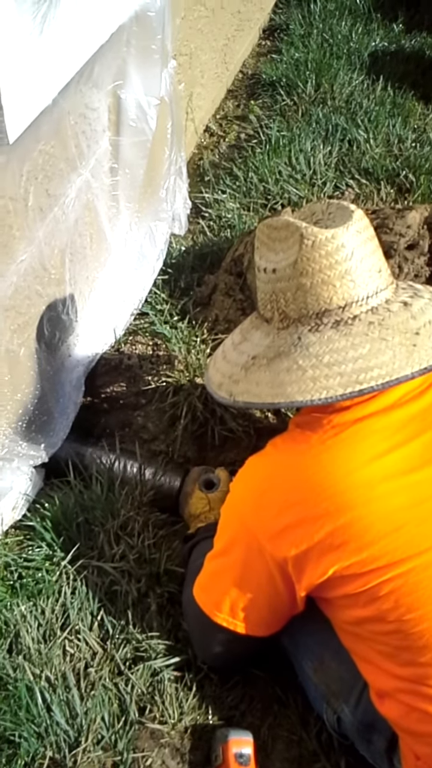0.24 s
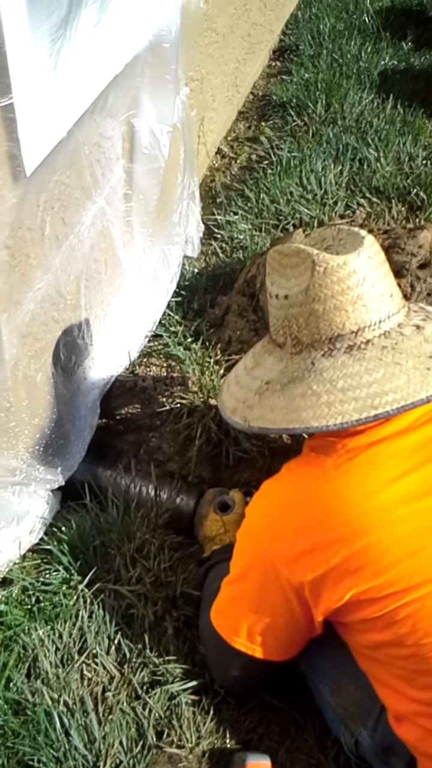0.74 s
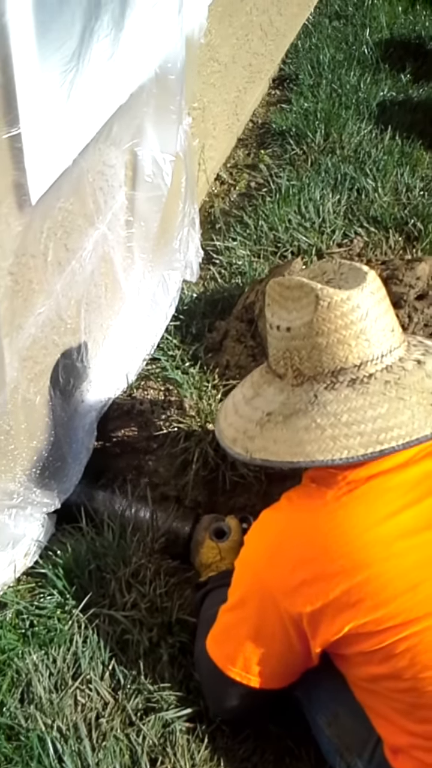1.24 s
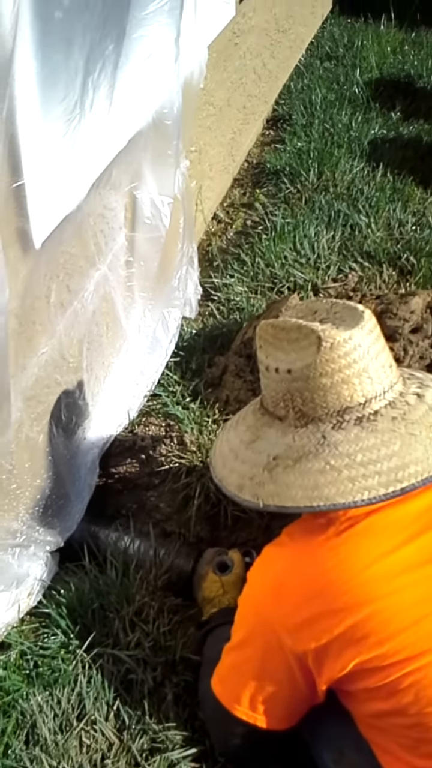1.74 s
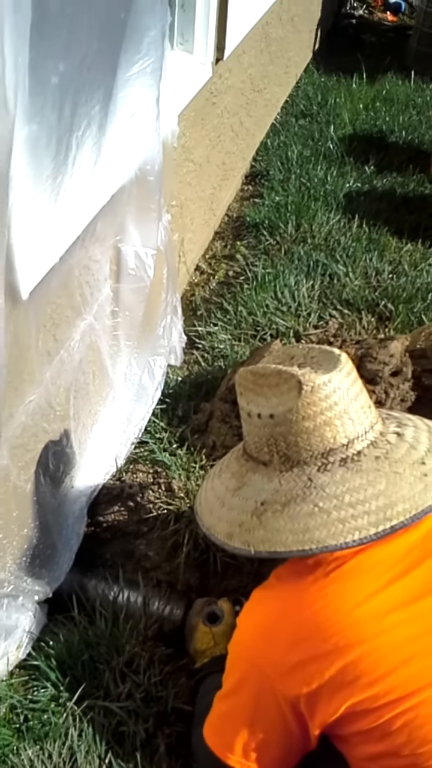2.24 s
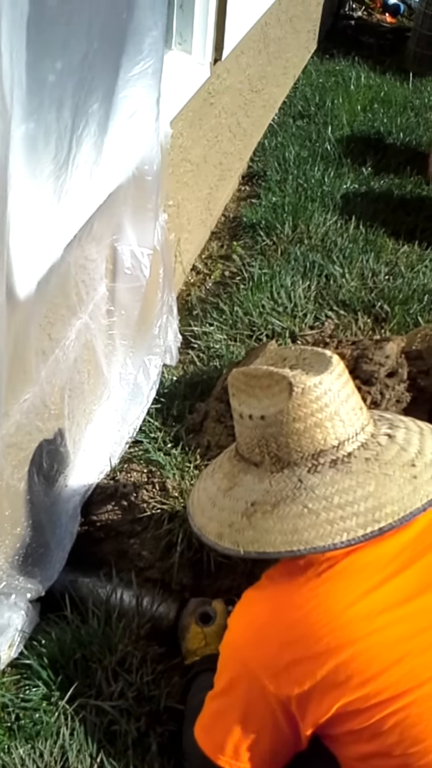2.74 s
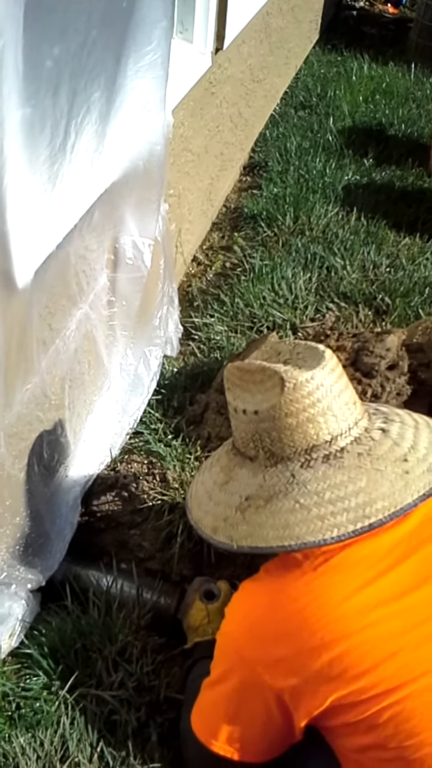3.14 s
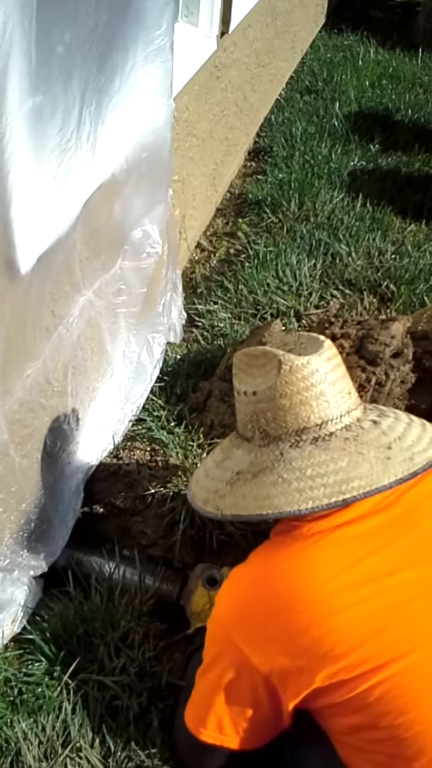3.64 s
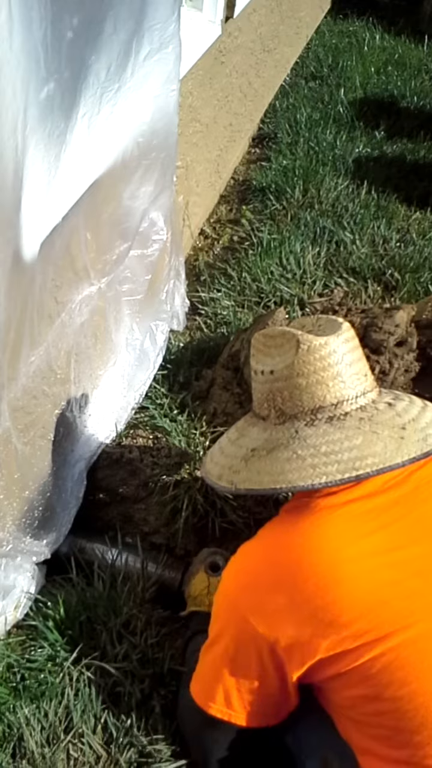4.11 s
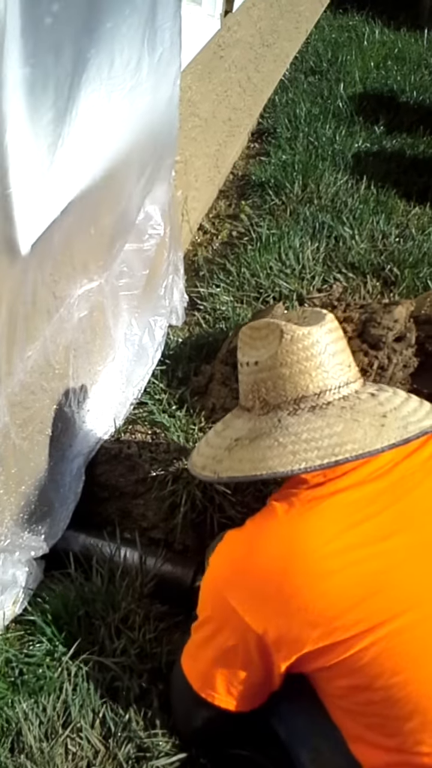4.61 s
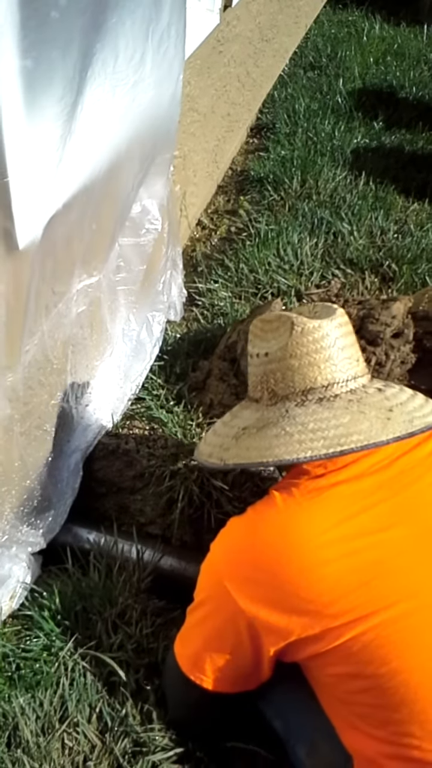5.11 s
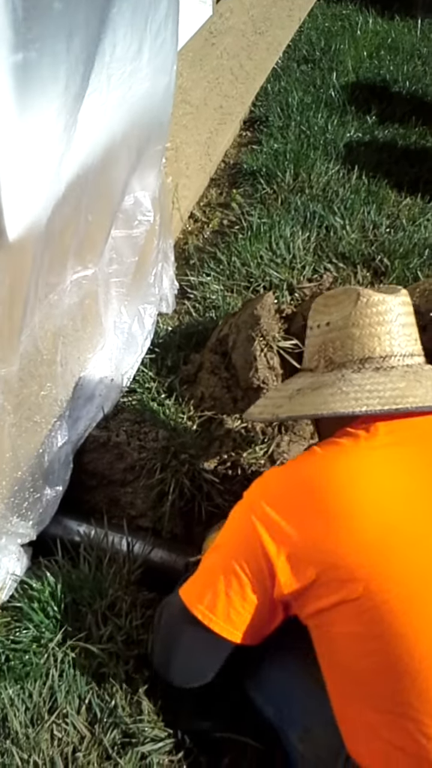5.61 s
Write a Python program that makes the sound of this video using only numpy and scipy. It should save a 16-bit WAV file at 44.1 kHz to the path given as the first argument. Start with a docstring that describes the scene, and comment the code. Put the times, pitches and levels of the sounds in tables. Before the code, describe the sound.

An electric core drill cuts into a concrete wall outdoors, a loud, harsh grinding under a high, wavering gear whine. About halfway through, the motor winds down and the steel barrel squeaks to a halt with a knock. A quiet, steady hiss and a faint distant machine hum remain. The drill is then shifted, with short scrapes, ringing metal knocks and a few light clicks.

```python
"""A harsh grinding under a wavering gear whine: an electric core drill cuts a concrete wall outdoors.
Fracturing grit excites the resonances of the steel barrel, and the gears sound multiples of the shaft rate.
The trigger is let go, the barrel drags and squeaks to a halt, and a steady hiss with a faint machine
hum remains. The drill is then shifted: it scrapes, the barrel knocks in its hole, and something clicks."""
import sys
import numpy as np
from scipy.fft import rfft, irfft, next_fast_len
from scipy.io import wavfile
from scipy.ndimage import uniform_filter1d, minimum_filter1d, map_coordinates

SR = 44100
rng = np.random.default_rng(int(sys.argv[2]) if len(sys.argv) > 2 else 0)


def unload_wav(signal):
    """Save mono or channel-first audio to the path in sys.argv[1] as 16-bit WAV at rate SR, clipped to [-1, 1]."""
    wavfile.write(
        sys.argv[1],
        SR,
        np.round(np.clip(np.atleast_2d(signal).T, -1, 1) * 32767).astype(np.int16),
    )


N = 258426
TIME = np.arange(N) / SR

# Gear, fan and commutator tones.
# Each row: multiple of the shaft rate, relative level in dB at a light bite, the same at a deep bite.
SHAFT_TONES = [(10, -23, -29), (11, -32, -28), (12, -30, -34), (16, -32, -31), (20, -33, -35),
               (21, -28, -24.5), (48, -29, -25.5)]

# Resonances. Each row: frequency in Hz, bandwidth in Hz, relative level in dB.
BARREL_MODES = [(2340, 40, -10), (2460, 140, -15.5), (2700, 110, -4), (3440, 110, -10.5), (3675, 45, -3),
                (4115, 41, -4.5), (4660, 95, 1.5), (4800, 126, -5), (5900, 370, -12.5), (7420, 260, -9)]  # the barrel, damped by the wall
BENDING_MODES = [(690, 71, -1.5), (1108, 80, 2), (1293, 100, -1), (1460, 58, -5), (1826, 78, 1.5),
                 (2155, 170, 5), (2840, 130, -3)]  # its slower bending
EDGE_MODES = [(4640, 550, 1), (5700, 200, -0.5), (6380, 320, 2.5)]
BODY_MODES = [(2450, 250, 2), (2930, 46, 1)]
HISS_PEAK = [(7210, 710, 0)]

# Noise spectra. Each row: frequency in Hz, relative spectral density in dB.
LIGHT_BITE_SPECTRUM = [(1500, -52), (2400, 3), (3200, -3), (4700, 4.5), (5500, -4), (7000, -5.5), (7950, 2),
                       (8800, -5.5), (9700, -12.5), (11000, -11), (15500, -12)]
DEEP_BITE_SPECTRUM = [(1500, -48), (2400, -2.5), (3200, -6), (4600, -1), (5300, -0.5), (5900, 2.5),
                      (7400, -3.5), (8600, -13), (10500, -6.5), (12500, -12), (15500, -17)]
WALL_SPECTRUM = [(50, -55), (90, -47), (150, -13), (240, -2.5), (600, -2), (850, -1.5), (1200, 0.5),
                 (2000, 2.5), (3500, -14)]
BUMP_SPECTRUM = [(40, -38), (100, -7), (150, -1), (280, 2), (600, -21)]
CRACK_SPECTRUM = [(60, -37), (150, -35), (400, -23), (650, -1.5), (950, -11), (1270, 5.5), (1600, -21),
                  (2300, 7.5), (3200, -5), (4600, -2.5), (6400, -3.5), (8500, -8), (15500, -22)]
THUD_SPECTRUM = [(30, 1), (70, -5), (250, 1), (900, -40)]
EDGE_SPECTRUM = [(2000, -21), (4500, 1), (6500, 3), (8000, 3), (10000, -16), (15500, -11)]
BODY_SPECTRUM = [(100, -39), (600, -4), (1800, -1.5), (2750, 6), (3400, -5), (5500, -17)]
YARD_SPECTRUM = [(30, -50), (80, -24), (170, -18.5), (240, -14), (300, -18), (480, -7), (1000, -8),
                 (1700, 1.5), (2500, 0), (3600, -7), (5500, -7.5), (7400, -9.5), (10000, -15), (15500, -16)]

# Successive slips of the halting barrel. Each row: frequency in Hz, level in dB.
SLIPS = [(2820, -15), (1480, -14), (2620, -13), (2750, -14), (5020, -11), (1110, -18)]
# Jolts of the drill body. Each entry: start in seconds.
BUMP_STARTS = [.079, .629, .832, 1.129, 1.419, 1.739, 1.926, 2.129, 2.249, 2.42]
# The loose barrel hits its hole. Each row: start in seconds, levels in dB of crack, ring and thud.
KNOCKS = [(2.932, -15, -34, -52), (4.704, -11, -20.5, -56), (4.713, -14, -22, -35), (4.751, -6.5, -15, -62)]
# Modes of the struck barrel. Each row: frequency in Hz, relative level in dB, 60 dB decay time in seconds.
STRUCK_MODES = [(672, -5.5, .24), (1276, -4.5, .34), (1812, -6, .3), (2186, -.5, .34), (2225, -3, .28),
                (2500, 1, .07), (2695, -5, .25), (3798, -5, .23), (4650, -2, .07), (5297, -7, .14),
                (7140, -13, .2)]
# The barrel slides in its hole.
# Each row: start, attack and length in seconds, scrape level in dB, squeal in dB relative to the scrape.
SLIDES = [(4.372, .0006, .036, -13.5, -5), (4.428, .001, .028, -21.5, -16), (4.677, .009, .054, -12, -16)]
# Clicks of the handled tool. Each row: start in seconds, relative levels in dB of edge and body.
CLICKS = [(3.239, -28, -25), (4.515, -22, -42), (5.024, -6.5, -15), (5.253, -32, -28), (5.430, -21, -40),
          (5.585, -23, -34)]
# Tones of a distant machine. Each row: frequency in Hz, level in dB.
HUM_TONES = [(80, -72), (168, -65), (356, -58), (560, -52), (587, -50.5), (1001, -49), (1297, -52),
             (1416, -52), (1766, -45), (2003, -47), (2589, -51), (2649, -51), (2945, -53)]

BITE_S, TRIGGER_OFF_S, JAM_S = 1.17, 2.51, 2.939  # the teeth sink in, the power stops, the barrel jams
SLIDE_T60, CLICK_T60 = 0.074, 0.088  # seconds to fall 60 dB


def drill():
    """Amplitude modulation: the barrel binds once a turn, which sways the force of the cut."""
    bite, speed_share, shaft_hz = motor()
    cut_db, drag_db = friction_levels(bite, speed_share)
    gear_ratio = 13.1
    barrel_angle = phase(shaft_hz / gear_ratio * (1 + .03 * wobble(8)))
    force = amp(.5 * np.sin(barrel_angle) + 0.65 * wobble(29.84) + 0.27 * np.sin(phase(shaft_hz)))
    cut = cutting(bite)
    drag = chatter(BENDING_MODES, flutter_db=3.5)
    rumble = amp(-18) * coloured(noise(), WALL_SPECTRUM) * amp(2.34 * wobble(30.1))
    grinding = force * (amp(cut_db) * (cut + rumble) + amp(drag_db) * drag)
    grinding = filtered(grinding, lambda hz: 1 - 1 / (1 + (hz / 142) ** 4))  # high-pass
    return grinding + amp(-0.2) * whine(shaft_hz, bite, barrel_angle)


def motor():
    """Load slows a motor: its speed sags as the bite (0-1) and the hole deepen; unpowered, it coasts."""
    start_hz, bite_sag_hz, sag_hz_per_s, coast_s = 228.9, 3.4, 1.7, .49
    bite = soft_step((TIME - BITE_S) / .22)
    speed_share = 1 - np.clip((TIME - TRIGGER_OFF_S) / coast_s, 0, 1) ** 1.47
    shaft_hz = speed_share * (start_hz - bite_sag_hz * bite - sag_hz_per_s * TIME)
    return bite, speed_share, shaft_hz


def friction_levels(bite, speed_share):
    """Cutting gives way to rubbing as the barrel slows; after the jam both decay exponentially."""
    cut_t60, drag_t60 = 0.59, 0.38
    since_jam = np.maximum(TIME - JAM_S, 0)
    pace = np.maximum(speed_share, speed_share[round(JAM_S * SR)])
    jam_drop_db = 5.5 * (1 - np.exp(-since_jam / 0.0035))
    binding_db = 6.5 * soft_step((0.6 - pace) / 0.024)  # sets in below 60% of full speed
    cut_db = -11.5 + 5 * np.log10(pace) - jam_drop_db - 60 * since_jam / cut_t60
    drag_db = -29 + 3 * bite + binding_db - 60 * since_jam / drag_t60
    return cut_db, drag_db


def cutting(bite):
    """Brittle fracture: grit radiates a broadband rasp, coloured by the bite, and rings the barrel."""
    light = np.sqrt(1 - bite) * coloured(grit(spread_db=1.4), LIGHT_BITE_SPECTRUM)
    deep = np.sqrt(bite) * coloured(grit(spread_db=2.5), DEEP_BITE_SPECTRUM)
    return amp(-1.68) * (light + deep) + amp(-3) * chatter(BARREL_MODES, flutter_db=1.6)


def chatter(modes, flutter_db):
    """Forced vibration: grit drives each resonance in its own fits and starts."""
    ring = np.zeros(N)
    for hz, width, db in modes:
        drive = np.sqrt(width) * amp(db + flutter_db * wobble(27.98))
        ring += drive * resonate(noise(), [(hz, width, 0)])
    return unit_rms(ring)


def whine(shaft_hz, bite, barrel_angle):
    """Frequency modulation: shaft harmonics sway once a barrel turn and swell as it comes free."""
    sway = (.0055 + .007 * bite) * np.sin(barrel_angle) + .001 * wobble(70)
    shaft_angle = phase(shaft_hz * (1 + sway))
    backlash_db = 5 * np.exp(-((TIME - TRIGGER_OFF_S - 0.13) / 0.065) ** 2)  # unpowered gears rattle
    swell = amp((1 + 4 * bite) * np.cos(barrel_angle - np.pi / 3) + backlash_db)
    slowing = shaft_hz / shaft_hz.max()
    tones = np.zeros(N)
    for order, light_db, deep_db in SHAFT_TONES:
        level = amp(light_db + (deep_db - light_db) * bite + 2 * wobble(35))
        dying = slowing ** (order ** 2 / 100)  # the highest tones die first
        tones += level * dying * np.sin(order * shaft_angle)
    return np.sqrt(2) * swell * tones


def squeaks():
    """Stick-slip friction: the halting barrel slips at an even beat, each slip a brief rough tone."""
    first_s, period_s, width_s = 2.837, .025, .009
    t = TIME - first_s
    sound = np.zeros(N)
    for k, (hz, db) in enumerate(SLIPS):
        pulse = np.exp(-((t - k * period_s) / width_s) ** 2)
        sound += amp(db) * pulse * np.sin(2 * np.pi * hz * t + .5 * wobble(250))
    return sound


def knocks():
    """Impact excitation: a knock cracks on concrete, rings the barrel's modes and thuds into the ground."""
    ring, t = np.zeros(N), np.arange(SR // 2) / SR
    for start, _, ring_db, _ in KNOCKS:
        for hz, db, t60 in STRUCK_MODES:
            envelope = amp(ring_db + db + rng.normal(0, 1.5) - 60 * t / t60) * (1 - np.exp(-t / .0005))
            ring[round(start * SR):][:len(t)] += envelope * np.sin(2 * np.pi * (hz * t + rng.random()))
    crack = sum(amp(db) * fade(start, t60=0.098) for start, db, _, _ in KNOCKS)
    crack *= coloured(grit(spread_db=-1.5), CRACK_SPECTRUM)
    thud = sum(amp(db) * fade(start, t60=.1) for start, _, _, db in KNOCKS)
    thud *= coloured(noise(), THUD_SPECTRUM)
    return ring + crack + thud


def scrapes():
    """Dry friction: steel catches on grit in squealing slides and clicks, a bright edge on a dull body."""
    judder = amp(1.1 * wobble(180))
    slides = judder * sum(amp(db) * slide(start, attack, length) for start, attack, length, db, _ in SLIDES)
    edge = slides + sum(amp(db) * fade(start, CLICK_T60) for start, db, _ in CLICKS)
    body = amp(-8) * slides + sum(amp(db) * fade(start, CLICK_T60) for start, _, db in CLICKS)
    bright = amp(-10.5) * coloured(grit(spread_db=-2), EDGE_SPECTRUM)
    bright += amp(-6.5) * resonate(noise(), EDGE_MODES)
    dull = amp(-1) * coloured(grit(spread_db=1), BODY_SPECTRUM)
    dull += amp(-4) * resonate(noise(), BODY_MODES)
    return edge * bright + body * dull + judder * squeal()


def slide(start, attack, length, lead_s=.023):
    """Static friction yields in stages: in this envelope loose grit gives way just before the slide."""
    trickle = amp(-11) * fade(start - lead_s, SLIDE_T60, attack, hold=lead_s / 2)
    return trickle + fade(start, SLIDE_T60, attack, hold=length)


def squeal(hz=2880):
    """Friction-excited vibration: the barrel holds a rough tone through the first half of each slide."""
    envelope = sum(amp(db + squeal_db) * fade(start, SLIDE_T60, attack, hold=length / 2)
                   for start, attack, length, db, squeal_db in SLIDES)
    return envelope * np.sin(2 * np.pi * hz * TIME + 1.3 * wobble(300))


def bumps():
    """Soft impacts carry mostly bass: the drill body jolts against the ground, harder at a deep bite."""
    bite, _, _ = motor()
    jolts = sum(fade(start, t60=0.25, attack=0.0046) for start in BUMP_STARTS)
    return amp(-39 + 5 * bite) * jolts * coloured(noise(), BUMP_SPECTRUM)


def yard():
    """A continuous spectrum under a line spectrum: steady hiss and a distant machine's wavering tones."""
    rush = coloured(grit(spread_db=0.45), YARD_SPECTRUM) * amp(0.31 * wobble(7.1))
    hiss = amp(-7) * resonate(grit(spread_db=2.5), HISS_PEAK) * amp(0.82 * wobble(8))
    hum = sum(amp(db + 1.5 * wobble(4.18)) * np.sin(2 * np.pi * hz * TIME + .8 * wobble(8))
              for hz, db in HUM_TONES)
    return amp(-28) * (rush + hiss) + hum


def grit(spread_db):
    """Modulated noise: countless tiny fractures that come in clumps."""
    return noise() * amp(spread_db * wobble(900))


def noise():
    """White noise: equal mean power at all frequencies."""
    return rng.standard_normal(N)


def wobble(rate):
    """Smooth random modulation, with rate knots a second."""
    knots = rng.standard_normal(int(N * rate / SR) + 4)
    return map_coordinates(knots, [np.arange(N) * rate / SR])


def fade(start, t60, attack=0.00046, hold=0):
    """Exponential decay after an attack and a hold, all in seconds."""
    t = np.maximum(TIME - start, 0)
    return amp(-60 * np.maximum(t - hold, 0) / t60) * (1 - np.exp(-t / attack))


def resonate(x, modes):
    """Modal superposition: x through damped resonators of alternating sign, at rms 1."""
    def response(f):
        return sum((-1) ** k * amp(db) * 1j * f * width / (hz * hz - f * f + 1j * f * width)
                   for k, (hz, width, db) in enumerate(modes))
    return unit_rms(filtered(x, response))


def coloured(x, spectrum):
    """Spectral shaping: x weighted by a curve in dB over log frequency, at rms 1."""
    points_hz, db = np.transpose(spectrum)
    return unit_rms(filtered(x, lambda hz: amp(np.interp(np.log(hz + 1), np.log(points_hz), db))))


def filtered(x, response):
    """Linear filtering: the spectrum of x times a frequency response."""
    size = next_fast_len(N + SR // 2)
    return irfft(rfft(x, size) * response(np.fft.rfftfreq(size, 1 / SR)), size)[:N]


def phase(hz):
    """Phase in radians is the integral of angular frequency."""
    return 2 * np.pi * np.cumsum(hz) / SR


def soft_step(x):
    """A logistic rise from 0 to 1 around x = 0."""
    return (1 + np.tanh(x / 2)) / 2


def amp(db):
    """Decibels as an amplitude ratio."""
    return 10 ** (np.asarray(db) / 20)


def unit_rms(x):
    """Normalisation to a mean power of 1."""
    return x / np.sqrt(np.mean(x ** 2) + 1e-20)


def scene():
    """Superposition: the sources add, alike in both channels."""
    return np.tile(drill() + squeaks() + bumps() + knocks() + scrapes() + yard(), (2, 1))


def record(dry):
    """Peak and band limiting: a fast gain dip holds down the peaks, and the top treble is cut off."""
    ceiling, top_hz = .8, 15800
    needed = np.minimum(1, ceiling / (np.abs(dry).max(axis=0) + 1e-9))
    gain = uniform_filter1d(minimum_filter1d(needed, size=61), size=61)
    return np.array([filtered(side * gain, lambda hz: hz < top_hz) for side in dry])


dry = scene()
out = record(dry)
unload_wav(out)
```